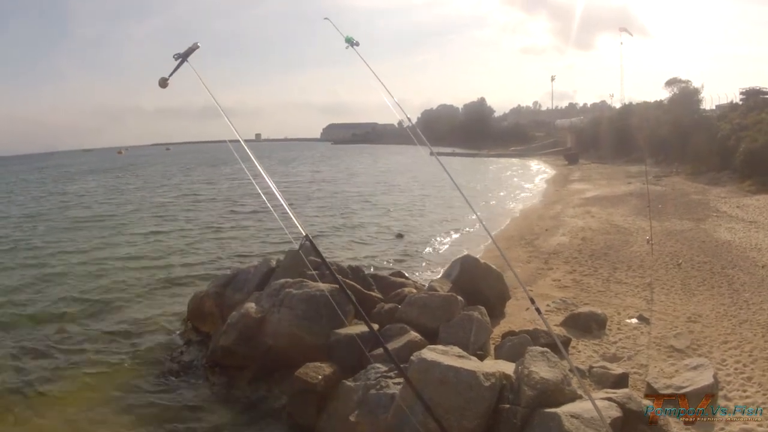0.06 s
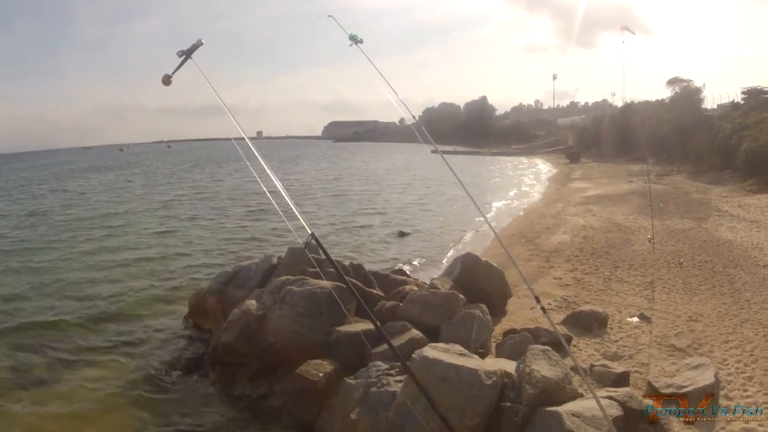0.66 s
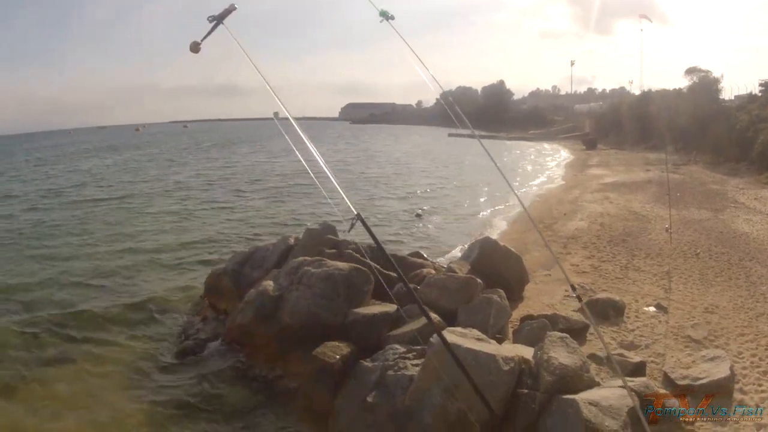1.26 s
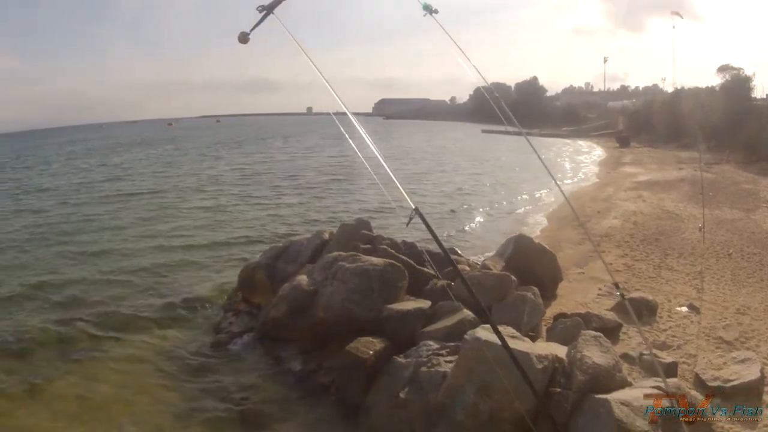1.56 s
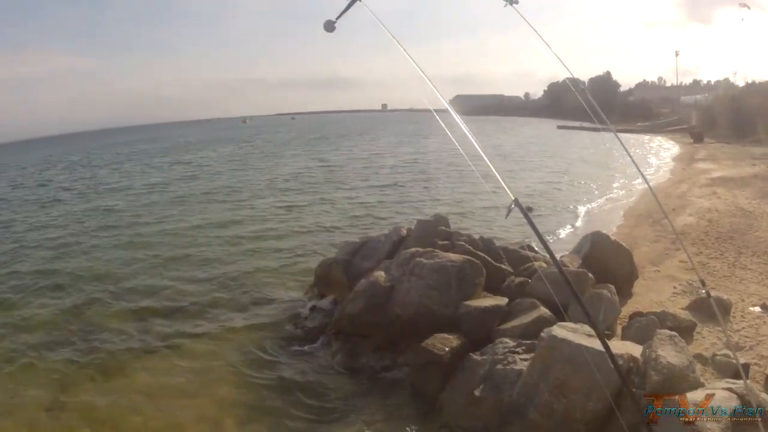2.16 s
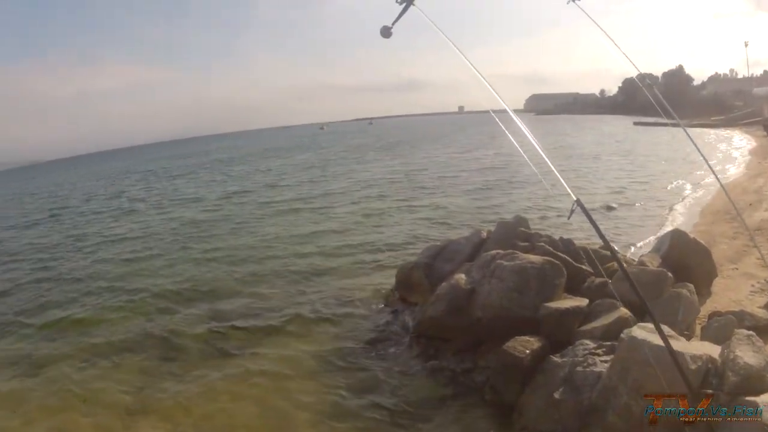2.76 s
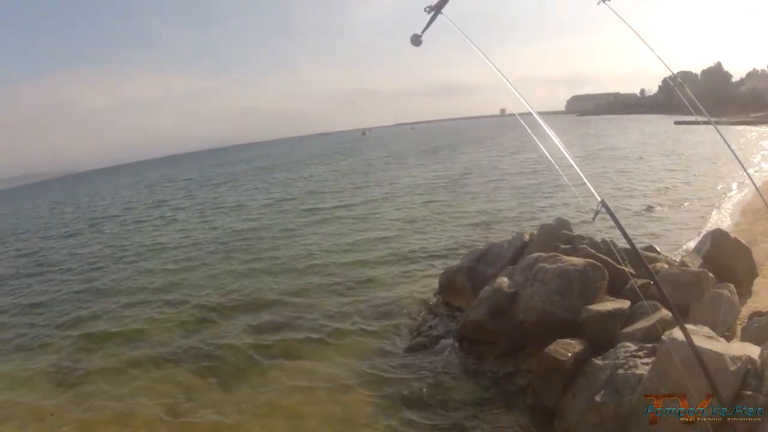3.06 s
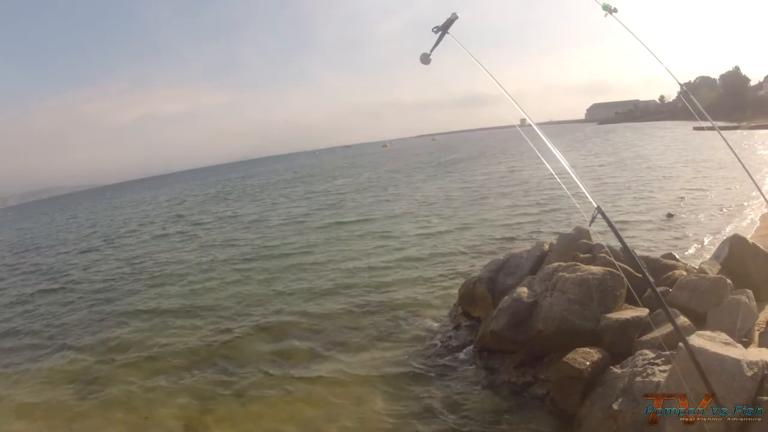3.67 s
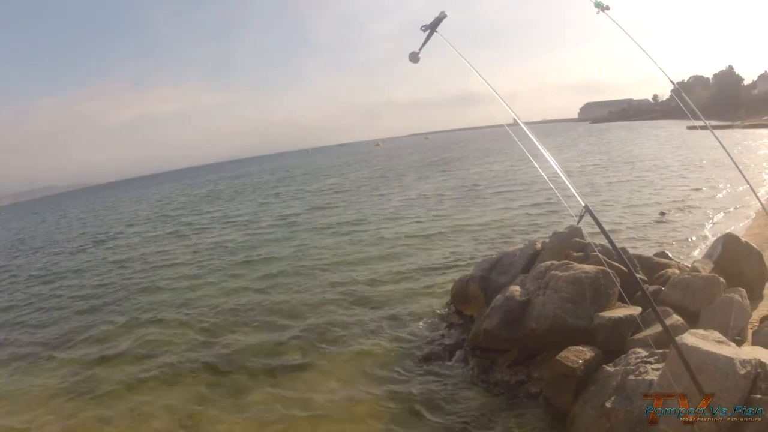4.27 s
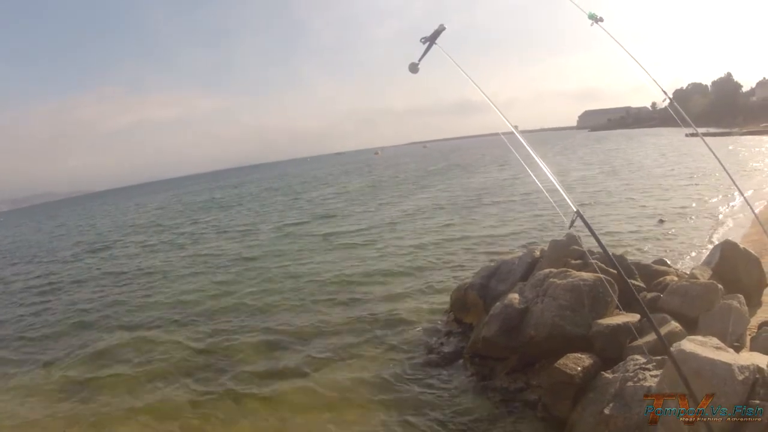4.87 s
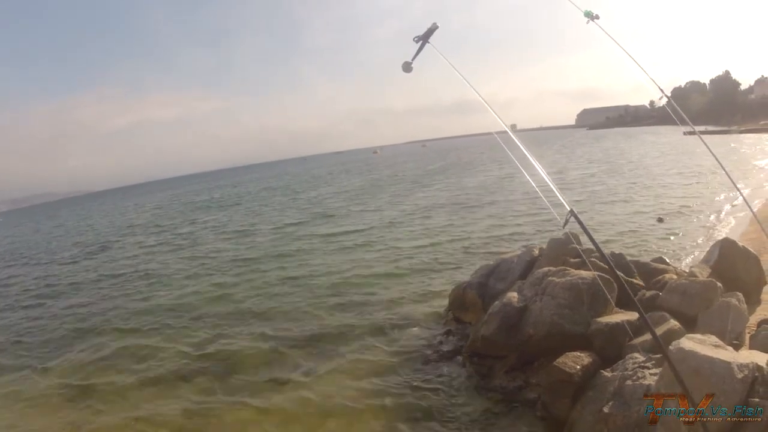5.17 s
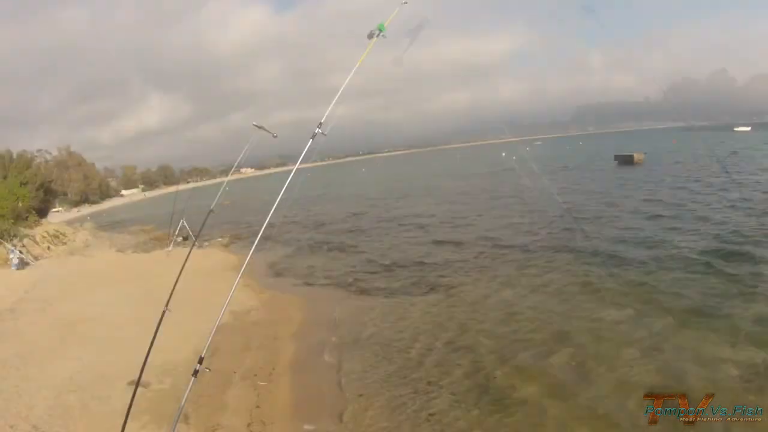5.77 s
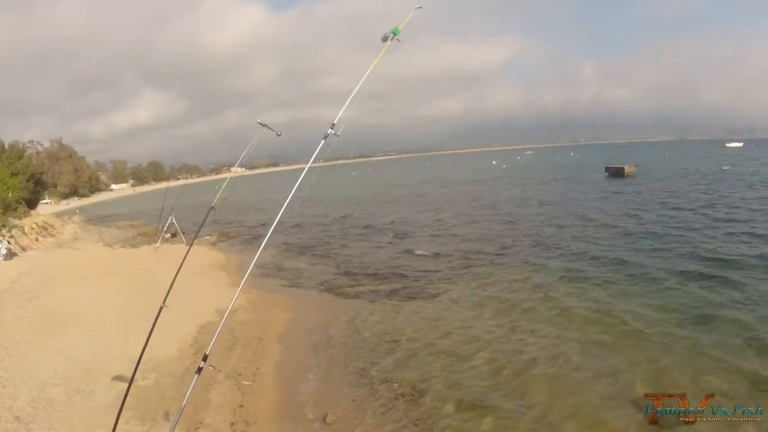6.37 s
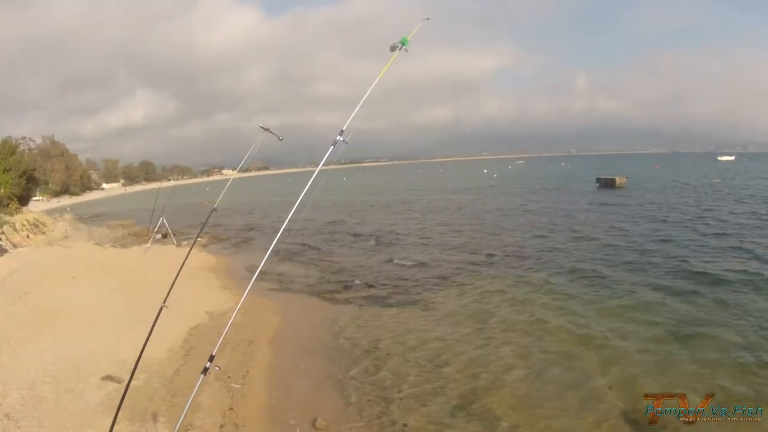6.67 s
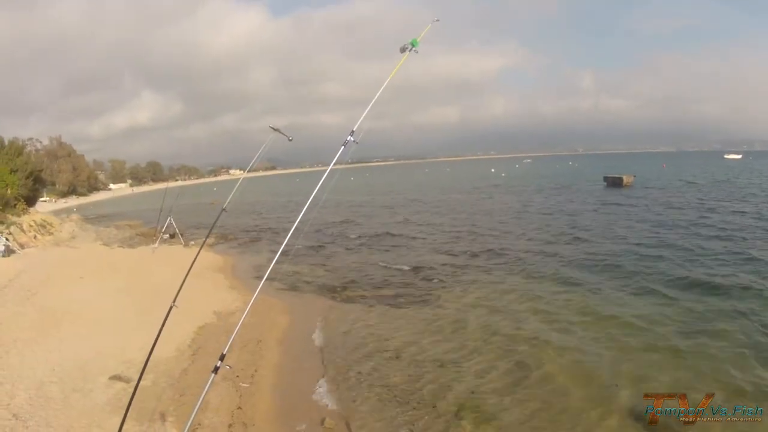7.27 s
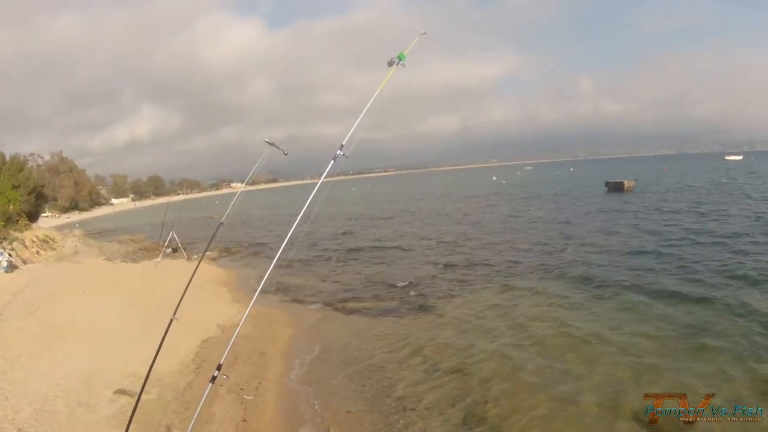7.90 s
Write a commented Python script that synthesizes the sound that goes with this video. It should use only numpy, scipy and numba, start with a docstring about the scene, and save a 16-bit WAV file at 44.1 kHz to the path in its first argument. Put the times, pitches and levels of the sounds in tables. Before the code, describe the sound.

Low wind rumble plays on an enclosed microphone at a beach, with small waves lapping quietly on rocks and sand beneath it. The wind starts light and builds from about 2 seconds, rising and falling in uneven gusts. The waves swell and drain as a soft, bubbly wash with a little slosh and fizz, around 1.3 seconds, most clearly near 3 seconds, and again near 5. A few tiny, high drips stand out around 3 and 4.5 seconds. From about 5.5 seconds the wind becomes much louder, buffeting with a hollow, boxy drone, with strong gusts between 6 and 7.3 seconds. More small waves wash in underneath near 6 and 7.7 seconds, and the wind continues to the end at about 8 seconds. The overall sound is muffled, with a slightly gritty edge in the treble.

```python
"""Wind buffets a camera in a closed case while small waves lap on rocks and sand. One wind strength drives the
turbulent pressure: large eddies rumble, small ones buffet, the case drones. From about 5.6 s the buffeting and
the drone are much louder. Each wave swells and drains as a wash of spray and resonating bubbles; a few drops
stand out. The camera samples at 8 kHz and holds each value, which mirrors the spectrum into a gritty treble."""
import sys
import numpy as np
from scipy import signal
from scipy.fft import rfft, irfft, next_fast_len
from scipy.io import wavfile
from scipy.ndimage import uniform_filter1d
from numba import njit

SR = 44100
rng = np.random.default_rng(int(sys.argv[2]) if len(sys.argv) > 2 else 0)


def store_pcm(level_fs):
    """Save levels as 16-bit WAV."""
    pcm = np.round(np.clip(level_fs, -1, 1) * 32767).astype(np.int16)
    wavfile.write(sys.argv[1], SR, np.atleast_2d(pcm).T)


N = 350016

# wind strength between gusts: (time [s], level over a moderate breeze [dB])
WIND_STRENGTH = [(0, -7), (1.1, -7.5), (1.8, -4.4), (2.55, 0), (3.2, 0.5), (4.0, -2), (4.85, 2.3),
                 (5.25, -2.5), (5.9, -1.04), (6.62, 1), (7.1, -3.5), (7.94, -4)]
# Gaussian gusts: (peak time [s], rise [dB], half width at 1/e [s])
WIND_GUSTS = [(.91, 3, 0.037), (2.022, 4, 0.093), (2.9, 3, 0.14), (3.52, 2.5, 0.043), (4.29, 3, 0.11),
              (5.424, 3.5, 0.084), (5.744, 4.5, 0.084), (6.075, 4.5, 0.09), (6.392, 5.5, 0.11),
              (6.688, 3.5, 0.074), (6.867, 4.5, 0.053), (7.218, 6.5, 0.078), (7.79, 3, 0.11)]
# spectra of large eddies, small eddies and the case: (frequency [Hz], relative density [dB])
RUMBLE_SPECTRUM = [(12, -57), (25, -13), (42, -3.5), (68, -1.5), (110, -3), (150, -9.5), (230, -18.5),
                   (500, -59.5)]
BUFFET_SPECTRUM = [(70, -17), (115, -5), (155, 1), (240, -3), (330, -7.5), (430, -13.5), (650, -39.5),
                   (1000, -45.5), (1600, -41), (3000, -54), (4000, -80)]
DRONE_SPECTRUM = [(250, -9), (400, -1), (480, 3.5), (570, 1), (700, -7.5), (850, -14.5), (1100, -23),
                  (1600, -36.5), (3000, -47.5), (4000, -56)]
# waves: (crest time [s], relative level [dB], rise constant [s], fall constant [s],
# slosh offset [dB], fizz offset [dB])
WAVE_CRESTS = [(.76, -54, .28, 0.19, 5, -13), (1.27, -47.5, 0.17, 0.39, 6.5, -17),
               (1.6, -54.5, 0.36, 0.19, 5.5, -12), (2.34, -59, 0.057, 0.078, 22, -20),
               (2.775, -51, 0.034, 0.038, -6, -12), (3.0, -46.5, 0.13, 0.078, -1, -11),
               (3.14, -43.3, 0.067, 0.071, 7, -8), (3.4, -54, 0.54, .3, 5.5, -7),
               (4.62, -56, 0.085, 0.44, 11.5, -5), (5.05, -49, 0.31, 0.17, 4.5, -12.5),
               (5.89, -46.5, 0.25, 0.19, 7, -8.5), (6.41, -53.5, 0.16, 0.15, 8, -10),
               (7.22, -54, 0.061, 0.19, 11, -14), (7.72, -48, 0.42, 0.44, 7, -10.5)]
# spectra of the wash, heaving water and bursting foam: (frequency [Hz], relative density [dB])
WASH_SPECTRUM = [(200, -29), (400, 2.5), (620, 10.5), (850, 4), (1150, -3.5), (1600, -2.5), (2000, -0.5),
                 (2500, 0.5), (2900, -2), (3200, -10), (3600, -14.5), (4000, -12)]
SLOSH_SPECTRUM = [(100, -9), (230, 1.5), (450, -4.5), (900, -19), (2000, -60)]
FIZZ_SPECTRUM = [(1500, -14), (2700, -7), (3150, 1.5), (3600, -4), (4000, -15), (4300, -55)]
# single drops: (time [s], relative level [dB], frequency [Hz], 60 dB decay time [s])
DROP_IMPACTS = [(2.714, -42, 3200, .012), (2.774, -39, 2190, .03), (3.019, -31, 2420, 0.023),
                (3.257, -37, 2800, .012), (3.491, -47, 2600, 0.011), (4.470, -46, 3380, 0.018),
                (4.478, -40, 3330, .02), (4.494, -46, 3280, .025), (5.057, -39, 3160, 0.0091),
                (6.298, -36, 2900, 0.017), (6.745, -33, 3120, 0.0063), (6.75, -42, 2970, .012)]
# the camera's response before and after sampling: (frequency [Hz], gain [dB])
INPUT_RESPONSE = [(3300, 0), (3800, 2), (3900, -1.5), (4000, -11)]
OUTPUT_RESPONSE = [(4000, -0.5), (8000, -1.4), (10500, -1.6), (13500, -3), (15300, -9)]


def wind():
    """Turbulent pressure grows with wind strength and excites the resonance of the hollow case."""
    t = np.arange(N) / SR
    louder_from_s, fade_length_s, drone_lead_s = 5.55, 0.49, 0.089
    gust_db = sum(db * np.exp(-((t - peak_s) / half_s) ** 2) for peak_s, db, half_s in WIND_GUSTS)
    strength_db = np.interp(t, *np.transpose(WIND_STRENGTH)) + gust_db + 1.38 * flutter(rate_hz=7.4)
    louder_stretch = lambda s: .5 + .5 * np.tanh(2 * (s - louder_from_s) / fade_length_s)
    # level in a moderate breeze + growth with strength + gain in the louder stretch
    rumble_db = -30.5 + 0.96 * strength_db + 2 * louder_stretch(t)
    buffet_db = -37 + 0.87 * strength_db + 14 * louder_stretch(t)
    drone_db = -48.5 + 0.42 * strength_db + 18.5 * louder_stretch(t + drone_lead_s)
    bursts = flutter(rate_hz=64)
    rumble = eddies(RUMBLE_SPECTRUM, steady_s=0.1) * undb(rumble_db)
    buffet = eddies(BUFFET_SPECTRUM, steady_s=0.087) * undb(buffet_db + 0.75 * bursts)
    drone = eddies(DRONE_SPECTRUM, steady_s=0.017) * undb(drone_db + 2 * bursts)
    return rumble + buffet + drone


def eddies(spectrum, steady_s):
    """Turbulence is random pressure: shaped noise, its power held even over steady_s."""
    pressure = noise(spectrum)
    return pressure / np.sqrt(smooth(pressure ** 2, steady_s) + 1e-9)


def waves():
    """Folding wavelets radiate in spurts: broadband spray, slosh and foam, and resonating bubbles."""
    wash_gain, slosh_gain, fizz_gain = surge()
    spray = noise(WASH_SPECTRUM + [(4300, -60)])
    swarm = bubbles(low_hz=378.0, high_hz=3720, cycles=28, spread_db=1.0, rise=0.21, count=17000)
    gurgle = colour(swarm, WASH_SPECTRUM)
    fizz = noise(FIZZ_SPECTRUM)
    slosh = noise(SLOSH_SPECTRUM)
    wash = undb(3.5) * spray + undb(1.5) * gurgle
    spurts = undb(0.78 * flutter(rate_hz=81))
    return (wash * wash_gain + slosh * slosh_gain + fizz * fizz_gain) * spurts


def surge():
    """Incoherent sources add in power: the waves sum to envelopes of wash, slosh and fizz."""
    t = np.arange(N) / SR
    rounding = .45  # width of the crest, as a share of rise or fall
    powers = lambda db, slosh_db, fizz_db: undb([[db], [db + slosh_db], [db + fizz_db]]) ** 2
    total = powers(db=-61, slosh_db=1, fizz_db=-13.5)  # steady lapping farther along the shore
    for crest_s, db, rise_s, fall_s, slosh_db, fizz_db in WAVE_CRESTS:
        from_crest = (t - crest_s) / np.where(t < crest_s, rise_s, fall_s)
        swell = np.exp(rounding - np.sqrt(from_crest ** 2 + rounding ** 2))
        total = total + powers(db, slosh_db, fizz_db) * swell ** 2
    return np.sqrt(total)


def bubbles(low_hz, high_hz, cycles, spread_db, rise, count):
    """Trapped air resonates: in a random swarm, small bubbles ring higher, start sharper, die sooner."""
    when, pitch, life, strength = rng.random((count, 4)).T
    hz = low_hz * (high_hz / low_hz) ** pitch
    gain = undb(-spread_db * np.log(np.maximum(strength, .004)))
    t60 = cycles * (.5 + life) / hz
    return ring(when * N / SR, hz, t60, gain * hz, rise)


@njit
def ring(starts_s, hz, t60, amplitude, rise):
    """A bubble is a damped oscillator whose pitch climbs by the fraction rise as it nears the surface."""
    out = np.zeros(N)
    for k in range(len(starts_s)):
        first, n = int(starts_s[k] * SR), int(t60[k] * SR) + 1
        angle = 2 * np.pi * hz[k] / SR
        phasor = amplitude[k] + 0j
        step = np.exp(1j * angle - np.log(1000) / n)
        glide = np.exp(1j * angle * rise / n)
        for i in range(first, min(first + n, N)):
            out[i] += phasor.imag
            phasor *= step
            step *= glide
    return out


def drops():
    """Each impact excites a small bubble's resonance and a splash of noise with the same envelope."""
    starts_s, db, hz, t60 = np.transpose(DROP_IMPACTS)
    pings = ring(starts_s, hz, t60, undb(db), rise=.04)
    envelope = np.abs(signal.hilbert(pings))
    splash = noise([(1000, -25), (2300, -3), (3200, -3), (4000, -1), (5000, -40)])
    return .8 * pings + 0.11 * envelope * splash


def undb(db):
    """Amplitude grows tenfold every 20 dB."""
    return 10 ** (np.asarray(db) / 20)


def unit(x):
    """Normalisation to rms 1."""
    return x / np.sqrt(np.mean(x ** 2))


def tone(x, response):
    """Linear filtering multiplies the spectrum by a response: (frequency [Hz], gain [dB])."""
    hz, db = np.transpose(response)
    n = next_fast_len(N, real=True)
    bin_hz = np.fft.rfftfreq(n, 1 / SR) + 1e-3
    gain = undb(np.interp(np.log(bin_hz), np.log(hz), db))
    return irfft(rfft(x, n) * gain, n)[..., :N]


def colour(x, spectrum):
    """Spectral shaping, at rms 1."""
    return unit(tone(x, spectrum))


def noise(spectrum):
    """White noise takes on the spectrum of its filter."""
    return colour(rng.standard_normal(N), spectrum)


def smooth(x, span_s):
    """Two moving averages act as a low-pass filter."""
    width = max(int(SR * span_s), 2)
    return uniform_filter1d(uniform_filter1d(x, width), width)


def flutter(rate_hz):
    """Low-passed noise of rms 1 fluctuates about rate_hz times a second."""
    return unit(smooth(rng.standard_normal(N), 1 / rate_hz))


def scene():
    """The pressures of wind and water superpose at one microphone."""
    return (wind() + waves() + drops())[None]


def record(dry):
    """Sample-and-hold makes spectral images: the steps mirror the sound around the sampling rate."""
    sample_hz, top_hz = 8000, 15330
    filtered = tone(dry * signal.windows.tukey(N, .003), INPUT_RESPONSE)
    coarse = signal.resample(filtered, round(N * sample_hz / SR), axis=1)
    steps = signal.resample(np.repeat(coarse, 20, axis=1), N, axis=1)
    low_pass = signal.ellip(12, .2, 80, top_hz, fs=SR, output="sos")
    return signal.sosfilt(low_pass, tone(steps, OUTPUT_RESPONSE))


dry = scene()
out = record(dry)
store_pcm(out)
```